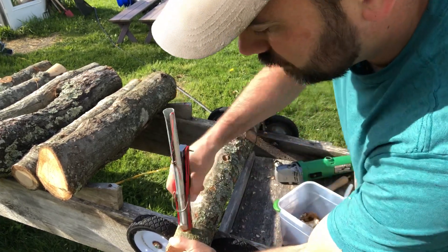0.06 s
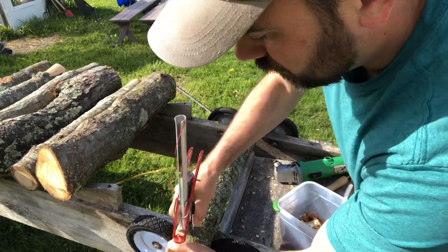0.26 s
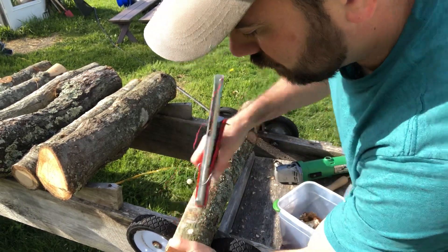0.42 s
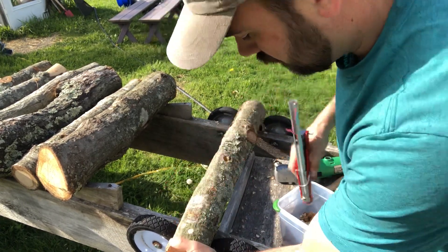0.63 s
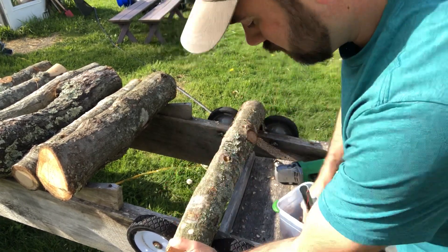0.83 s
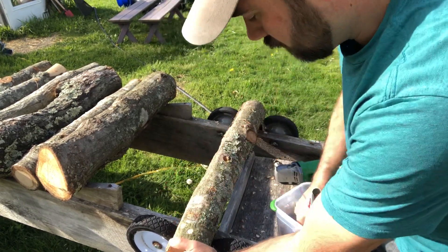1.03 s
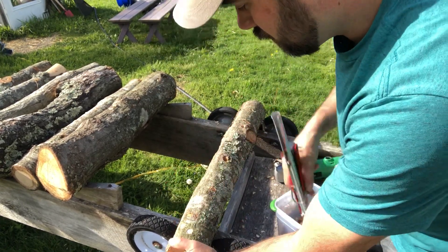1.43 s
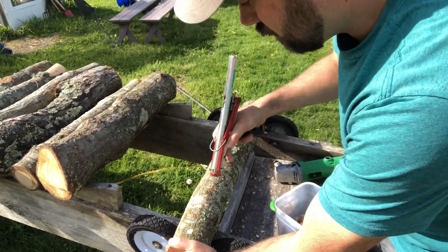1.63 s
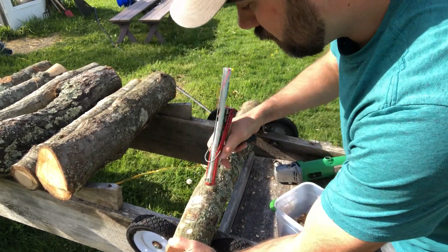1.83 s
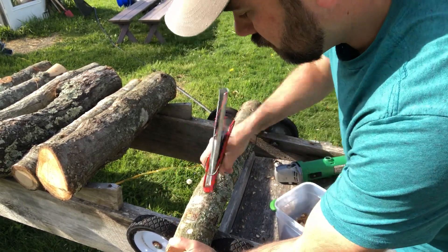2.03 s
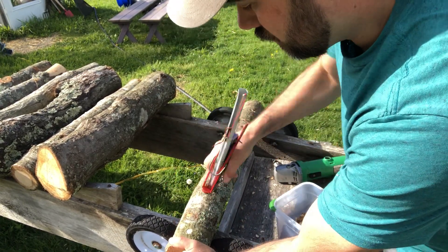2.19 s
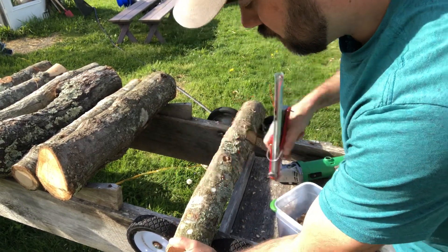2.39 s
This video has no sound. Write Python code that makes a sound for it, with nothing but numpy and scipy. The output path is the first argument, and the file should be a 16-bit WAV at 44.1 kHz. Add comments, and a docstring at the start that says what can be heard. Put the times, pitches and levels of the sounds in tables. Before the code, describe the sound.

Close by in a quiet yard, a metal plunger tool snaps and clicks on a log. Dull jabs into a plastic tub of crunching sawdust follow, then light clinks and a second snap with a hollow knock and brief creak.

```python
"""Inoculation tool and sawdust tub

A spring-loaded metal tool for plugging logs with sawdust is worked close by, on a quiet lawn.
Twice its plunger slides down, snaps against the stop, knocks the log and springs back.
In between, the tip is jabbed into a plastic tub, which thumps while the sawdust crunches.
The loose thumb lever clinks, metal clicks, fingers rustle, and wood creaks as the tip twists out."""
import sys
import numpy as np
from scipy import signal
from scipy.fft import rfft, irfft
from scipy.io import wavfile
from scipy.ndimage import uniform_filter1d

SR = 44100
rng = np.random.default_rng(int(sys.argv[2]) if len(sys.argv) > 2 else 0)


def inscribe(sig):
    """Save sig as 16-bit PCM at rate SR to the path in sys.argv[1].

    A 1-D sig is mono; a 2-D sig holds one channel per row.
    Samples are clipped to [-1, 1] before scaling.
    """
    pcm = np.round(np.clip(np.atleast_2d(sig).T, -1, 1) * 32767)
    wavfile.write(sys.argv[1], SR, pcm.astype(np.int16))


N = 112454
T = np.arange(N // 5) / SR  # time within one short sound [s]
CRUNCH_GRAIN = 0.49  # roughness of crunches and rustles

# tone colour of steel on steel (frequency [Hz], level [dB])
STEEL_COLOUR = [(100, -34), (400, -12.5), (1800, -15.5), (2350, 3.5), (2900, -3.5), (3800, 2.5), (5200, 2),
                (7000, -3), (9500, -6.5), (16000, -12.5)]
# dull tone colour of the rattling tub and of packed sawdust (frequency [Hz], level [dB])
RATTLE_COLOUR = [(50, -28), (400, -3.5), (1200, -7), (1600, -14), (16000, -61.5)]


def amp(db):
    """Turn decibels into a gain."""
    return 10 ** (np.asarray(db) / 20)


def fade(fade_s):
    """A blow dying away: it loses 60 dB over the fade time."""
    return amp(-60 * T / fade_s)


def onset(rise_s):
    """A brief rise while a contact builds up."""
    return 1 - np.exp(-T / rise_s)


def swell(rise_s):
    """A rounded push that peaks at the rise time and dies away."""
    progress = T / rise_s
    return (progress * np.exp(1 - progress)) ** 2


def noise(colour, tilt=0, peak_hz=1000, lift_db=0, size=len(T)):
    """Coloured noise of strength 1, with one lifted peak and a tilt in dB per octave above 1500 Hz."""
    freqs = np.maximum(np.arange(size // 2 + 1) * SR / size, 1)
    hz, db = np.array(colour).T
    shape_db = np.interp(np.log(freqs), np.log(hz), db)
    shape_db += tilt * np.log2(np.maximum(freqs, 1500) / 1500)
    shape_db += lift_db * np.exp(-(np.log2(freqs / peak_hz) / 0.14) ** 2)
    hiss = irfft(amp(shape_db) * np.exp(2j * np.pi * rng.random(len(freqs))), size)
    return hiss / hiss.std()


def grains(depth):
    """The fast, uneven flutter of tiny catches and slips."""
    wobble = np.sqrt(40) * uniform_filter1d(rng.standard_normal(len(T)), size=40)
    gain = np.exp(depth * wobble)
    return gain / np.sqrt(np.mean(gain ** 2))


def ring(tones, tilt=0):
    """An object's own fading tones; each blow shares its force out anew, the high ones varying most."""
    out = np.zeros(len(T))
    for hz, db, fade_s in tones:
        scatter_db = 4.5 * min(hz / 4500, 1) * rng.standard_normal()
        tilt_db = tilt * np.log2(hz / tones[1][0])
        wave = np.sin(2 * np.pi * (hz * T + rng.random()))
        out += amp(db + scatter_db + tilt_db) * fade(fade_s) * wave
    return out


def resonate(sound, spread_db=3.5, width_hz=220):
    """The place of contact makes the metal favour some narrow bands of pitch, picked at random."""
    freqs = np.arange(len(T) // 2 + 1) * SR / len(T)
    bumps = np.interp(freqs / width_hz, np.arange(256), rng.standard_normal(256))
    return irfft(rfft(sound) * amp(spread_db * bumps), len(T))


def steely(sound):
    """A sound coloured by the metal, then brought to strength 1."""
    coloured = resonate(sound)
    return coloured / coloured.std()


def friction(depth, tilt):
    """Grainy noise of rubbing on steel."""
    return resonate(noise(STEEL_COLOUR, tilt) * grains(depth))


def add(out, start, sound):
    """Mix a sound in at its start time in seconds."""
    i = int(start * SR)
    out[i:i + len(sound)] += sound[:N - i]


def air(level_db=-51.5, waver_db=1.68):
    """A quiet outdoor background that wavers slightly."""
    # tone colour of the open air (frequency [Hz], level [dB])
    colour = [(25, -5), (55, -5.5), (250, 0.5), (450, -9), (1100, -12.5), (2400, -19.5), (3800, -17.5),
              (7500, -33.5), (16000, -43.5)]
    waver = np.interp(np.arange(N), np.linspace(0, N, 20), rng.standard_normal(20))
    return amp(level_db - waver_db * waver) * noise(colour, size=N)


def clinks_and_clicks():
    """Light, ringing clinks of the loose lever and a few hard, dry metal clicks."""
    # clinks and clicks (time [s], level [dB], tilt [dB per octave], relative ring level [dB])
    hits = [(.001, -30, -5, -5.5), (0.2971, -11.5, -2.5, -22), (0.3056, -30, 1, -32),
            (0.4444, -21, -2, -7.5), (0.5379, -36, -4, -6.5), (0.618, -28.5, -3.5, -8.5),
            (0.689, -26, -3.5, -8), (0.7647, -18, -6.5, -12.5), (1.004, -25, -2, -44),
            (1.066, -32.5, 5.5, -5), (1.377, -41.5, -4.5, -4), (1.4706, -36.5, -11, -7),
            (1.666, -51.5, -13, -0.5), (1.743, -27.5, -6.5, -10), (1.75, -21.5, 3, -20.5),
            (1.7672, -24, 2, -14), (1.7925, -28.5, -5.5, -20.5), (1.8282, -29.5, -2.5, -8.5),
            (2.1814, -24, -8, -22), (2.3211, -29, -3, -3.5), (2.3403, -30, -2, -10),
            (2.3974, -32, -8.5, -3), (2.5017, -28.5, 1.5, -7.5)]
    # the lever's own tones (frequency [Hz], level [dB], fade time [s])
    lever_tones = [(1650, -17, 0.098), (2269, 1, 0.068), (2450, -9, 0.022), (3510, -0.5, 0.038),
                   (4570, -34.5, 0.11), (5290, -10.5, 0.099), (6630, -8.5, 0.045), (8170, -23.5, 0.065),
                   (8646, -23, 0.047), (9270, -14.5, 0.066)]
    out = np.zeros(N)
    for start, db, tilt, ring_db in hits:
        tick = steely(noise(STEEL_COLOUR, tilt)) * fade(0.024)
        ringing = amp(ring_db + 4.5) * ring(lever_tones, tilt)
        add(out, start, amp(db) * onset(0.00048) * (tick + ringing))
    return out


def fingers():
    """The hand rustles faintly as it changes its grip on the metal."""
    # fingers shifting on the handle (time [s], level [dB], rise time [s])
    rustles = [(.028, -42, 0.0027), (.112, -50, 0.0063), (1.427, -52, 0.0034), (1.736, -41, 0.0012),
               (1.939, -53, .007)]
    out = np.zeros(N)
    for start, db, rise_s in rustles:
        add(out, start, amp(db) * np.sqrt(swell(rise_s)) * friction(CRUNCH_GRAIN, tilt=-9))
    return out


def plunger(release_s=0.0078):
    """Steel slides, growing louder and brighter, then cracks against the stop and rings the barrel."""
    # slides in the barrel (start [s], end [s], level at the end [dB], growth [dB])
    slides = [(0.152, 0.179, -32, 18.5), (0.179, 0.219, -22.5, 10.5), (0.332, 0.365, -26.5, 19),
              (0.364, 0.386, -29, 0.5), (2.028, 2.075, -25, 17), (2.199, 2.255, -25.5, 17)]
    # hits on the stops, with rebounds (time [s], relative level [dB], peak frequency [Hz],
    # peak lift [dB], fade time [s], relative ring level [dB])
    snaps = [(0.2096, -6.5, 5940, 3, 0.018, -24), (0.2185, -8.5, 5300, 8, 0.031, -19),
             (0.226, -22, 5200, -5, 0.026, -3.5), (0.3812, -11, 1726, 32.5, 0.023, -42),
             (0.3933, -9.5, 3850, 7, 0.039, -29), (0.4126, -21, 3860, 8, 0.041, -53),
             (2.0789, -5, 5000, 9.5, 0.019, -29), (2.0872, -22, 4400, 2, 0.069, -11),
             (2.25, -10.5, 1480, 1.5, 0.0056, -39), (2.2517, -20, 5400, 2, 0.02, -46),
             (2.263, -9, 5010, 1, 0.033, -22), (2.2761, -18, 4900, 6, 0.028, -6)]
    # the barrel's own tones (frequency [Hz], level [dB], fade time [s])
    barrel_tones = [(1685, 7.5, 0.061), (2360, -10.5, 0.17), (3400, 7, 0.026), (5140, -6.5, 0.02),
                    (7000, -1, 0.034)]
    out = np.zeros(N)
    treble_cut = signal.butter(2, 8000, fs=SR, output="sos")
    for start, end, db, growth_db in slides:
        length = end - start
        force = amp(growth_db * (np.minimum(T / length, 1) - 1))
        force *= amp(-60 * np.maximum(T - length, 0) / release_s)
        rub = friction(depth=0.27, tilt=-2.2)
        dull = signal.sosfiltfilt(treble_cut, rub)
        brightening = dull + np.sqrt(force) * (rub - dull)
        add(out, start, amp(db) * force * onset(0.0086) * brightening)
    for start, db, peak_hz, lift_db, fade_s, ring_db in snaps:
        crack = steely(noise(STEEL_COLOUR, 0, peak_hz, lift_db)) * fade(fade_s) * onset(0.00035)
        ringing = amp(ring_db) * ring(barrel_tones) * onset(0.0029)
        add(out, start, amp(db + 2.5) * (crack + ringing))
    return out


def log_knocks():
    """Each press ends in a hollow knock and the dull crunch of a sawdust plug squeezing into its hole."""
    # the packed plunger hitting the log (time [s], level [dB])
    knocks = [(.2150, -26.5), (2.0840, -29.5)]
    # the log's own tones (frequency [Hz], level [dB], fade time [s])
    log_tones = [(119.6, -15, 0.15), (903, 11, 0.061)]
    out = np.zeros(N)
    for start, db in knocks:
        squeeze = amp(-8) * noise(RATTLE_COLOUR) * grains(CRUNCH_GRAIN) * np.sqrt(swell(0.013))
        hollow = ring(log_tones) * onset(0.0052)
        add(out, start, amp(db) * (hollow + squeeze))
    return out


def thumps(detune=0.03, tone_db=-10, tone_fade_s=0.15):
    """A cushioned knock; the soft tub walls rattle, shudder and ring, pitched a bit anew each time."""
    # the tip hitting the tub or log (time [s], level [dB], pitch [Hz], rise time [s])
    hits = [(0.297, -30, 506, 0.0016), (0.7442, -7.5, 516, 0.0031), (0.7659, -11, 562, 0.0021),
            (.7690, -5, 882, 0.0021), (0.7712, -21.5, 218, 0.0082), (.7990, -27, 647, 0.0049),
            (.8205, -32, 910, 0.0021), (0.871, -25, 554, 0.0037), (.8800, -33, 223, .005),
            (0.931, -36.5, 393, 0.0021), (1.0040, -15.5, 422, 0.0025), (1.0045, -24.5, 1310, 0.0032),
            (1.0387, -23, 376, 0.0069), (1.05, -21, 205, 0.0052), (1.2558, -19.5, 471, 0.0043),
            (2.094, -31.5, 336, 0.0082)]
    # the tub's own tones (frequency [Hz])
    tub_pitches = [228, 388, 520, 640]
    # tone colour of the tub and its load shuddering (frequency [Hz], level [dB])
    shudder_colour = [(40, -19), (220, -5.5), (1600, -26), (16000, -61)]
    out = np.zeros(N)
    for start, db, hz, rise_s in hits:
        knock = swell(rise_s) ** 2 * np.sin(2 * np.pi * hz * T)
        tones = [(f * np.exp(detune * rng.standard_normal()), tone_db, tone_fade_s) for f in tub_pitches]
        shudder = amp(-10.5) * noise(shudder_colour) * onset(0.0048) * fade(0.12)
        walls = ring(tones) + noise(RATTLE_COLOUR) * fade(0.043) + shudder
        walls_db = -15.5 + 0.61 * db  # the walls grow louder more slowly than the knock
        add(out, start, amp(db) * knock + amp(walls_db) * onset(0.00043) * walls)
    return out


def sawdust():
    """Sawdust packs into the tip with short crunches; the grit sets the metal ringing."""
    # crunches (time [s], level [dB], rise time [s], relative ring level [dB], peak frequency [Hz])
    crunches = [(.7500, -30, 0.0016, -38, 5240), (0.769, -29.5, 0.0084, -5, 2270),
                (0.8201, -40.5, 0.006, -3, 2280), (0.8702, -28, 0.0061, -11.5, 2130),
                (0.94, -33.5, 0.0036, -37, 2540), (1.028, -40, 0.0038, -25, 2750),
                (1.0402, -26, 0.0038, -19, 2830), (1.058, -41, 0.026, -19, 2260),
                (1.1251, -22, 0.003, -15, 2670), (1.2563, -29.5, 0.0018, -9, 2600),
                (1.265, -34.5, 0.0078, -25, 7100), (1.3221, -23, 0.0031, -15.5, 7430),
                (1.3360, -27.5, 0.0033, -23, 2280), (1.535, -49, 0.012, 6, 2860),
                (2.097, -42, 0.02, -10.5, 2720)]
    # tone colour of the grit (frequency [Hz], level [dB])
    grit_colour = [(200, -3), (1800, -7.5), (2750, 2.5), (4200, -1), (7000, 0.5), (8500, -10),
                   (16000, -14.5)]
    # the metal tip's own tones (frequency [Hz], level [dB], fade time [s])
    tip_tones = [(1662, -9, 0.23), (2218, 11, 0.051), (2650, 11, 0.031), (5040, -19, .05),
                 (9380, -6, 0.087)]
    out = np.zeros(N)
    for start, db, rise_s, ring_db, peak_hz in crunches:
        grit = noise(grit_colour, peak_hz=peak_hz, lift_db=6.5) * grains(CRUNCH_GRAIN)
        crunch = np.sqrt(swell(rise_s)) * steely(grit)
        ringing = amp(ring_db) * ring(tip_tones) * onset(rise_s)
        add(out, start, amp(db) * (crunch + ringing))
    return out


def creak():
    """The wood gives a short, rough groan that falls in pitch as the pressure comes off."""
    # course of the creak as the tip twists out of the hole (time [s], pitch [Hz], level [dB])
    course = [(2.135, 1108, -49), (2.155, 857, -42), (2.167, 534, -34), (2.174, 450, -34),
              (2.189, 392, -59)]
    times, hz, db = np.array(course).T
    start = times[0]
    pitch = np.interp(start + T, times, hz) * grains(depth=0.14)
    level = amp(np.interp(start + T, times, db, right=-np.inf)) * grains(depth=0.71)
    out = np.zeros(N)
    add(out, start, level * np.sin(2 * np.pi * np.cumsum(pitch) / SR))
    return out


def yard_echo(sound, level_db=-20):
    """The log pile and the ground scatter back a faint, short echo."""
    # tone colour of the echo (frequency [Hz], level [dB])
    colour = [(2500, 0.5), (16000, -12)]
    build_up = swell(0.00154).cumsum()
    echo = noise(colour) * fade(0.19) * build_up
    echo /= np.sqrt(np.sum(echo ** 2))
    return amp(level_db) * signal.fftconvolve(sound, echo)[:N]


def scene():
    """Tool, log and tub in the open air, in one channel."""
    near = plunger() + clinks_and_clicks() + log_knocks() + thumps() + sawdust() + fingers() + creak()
    return (near + yard_echo(near) + air())[None]


def record(dry):
    """The microphone rounds the loudest peaks, then drops the deepest bass and the highest treble."""
    low_hz, top_hz = 41.7, 15900
    bass_cut = signal.butter(2, low_hz, "high", fs=SR, output="sos")
    treble_cut = signal.ellip(10, 0.2, 80, top_hz, fs=SR, output="sos")
    return signal.sosfilt(treble_cut, signal.sosfilt(bass_cut, np.tanh(dry)))


dry = scene()
out = record(dry)
inscribe(out)
```